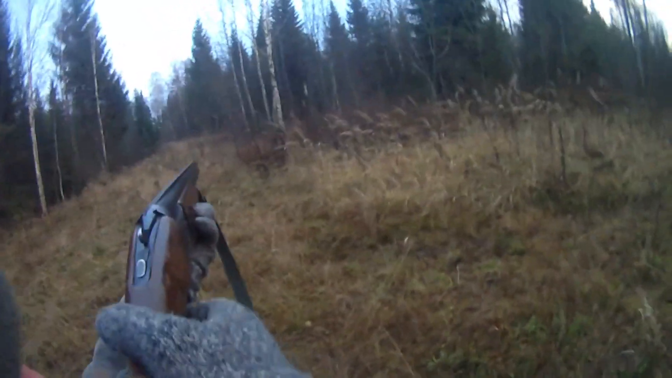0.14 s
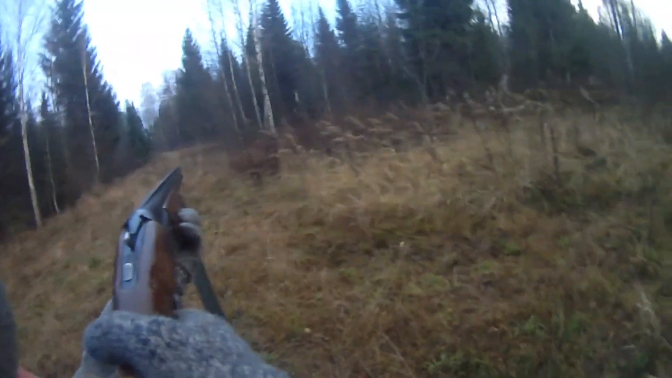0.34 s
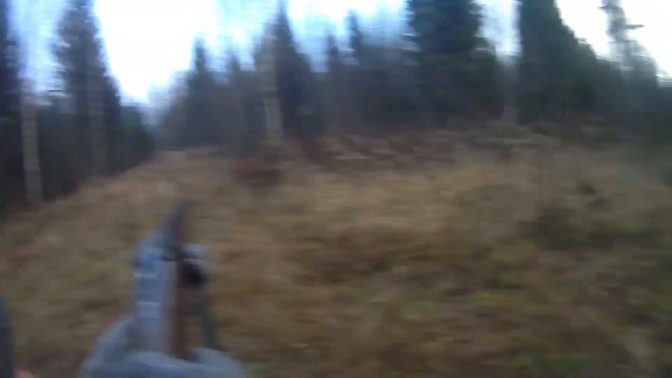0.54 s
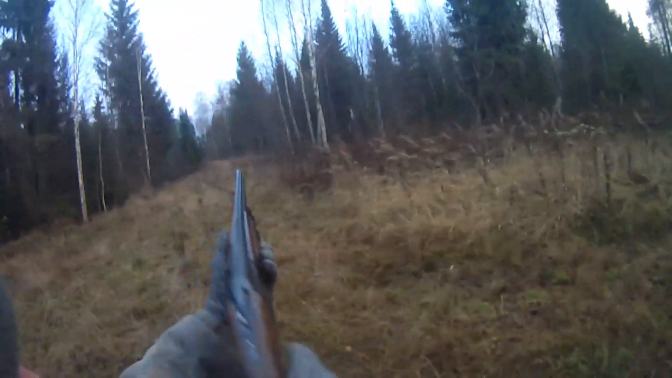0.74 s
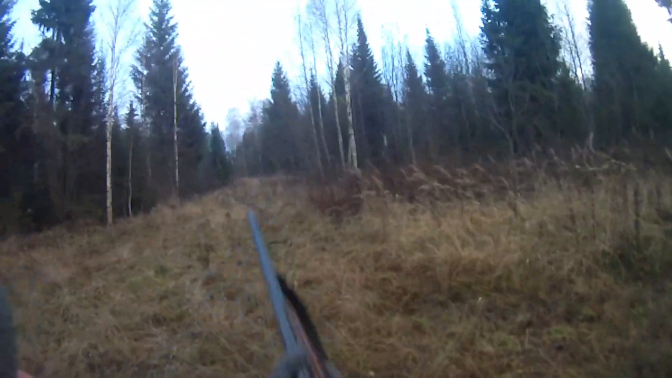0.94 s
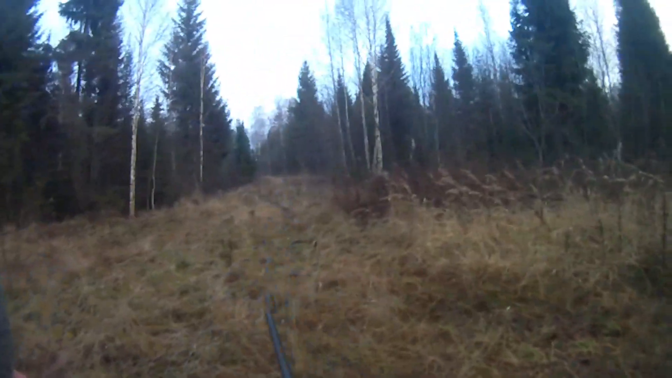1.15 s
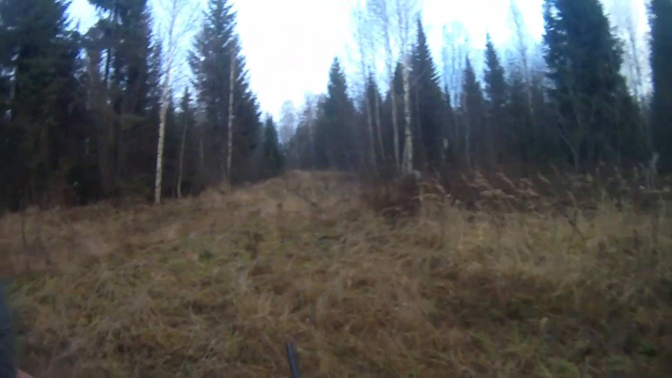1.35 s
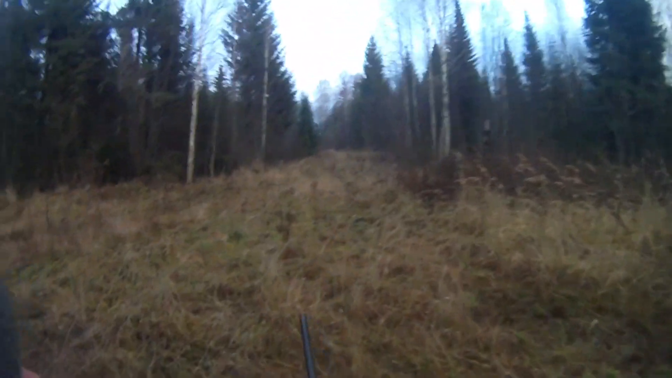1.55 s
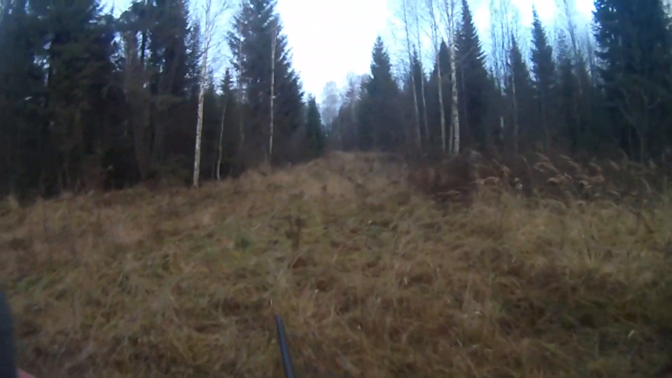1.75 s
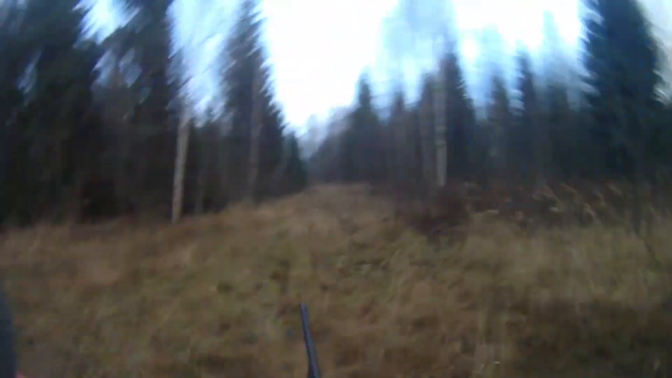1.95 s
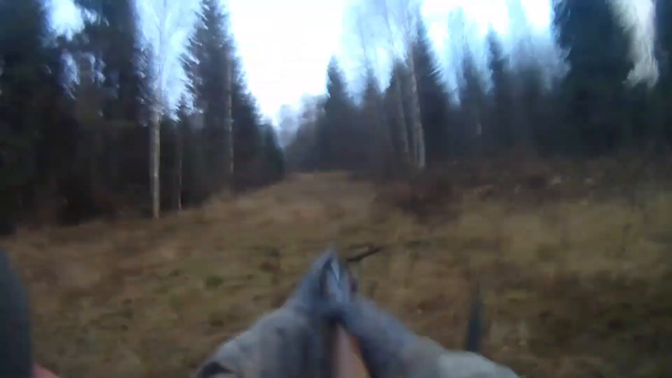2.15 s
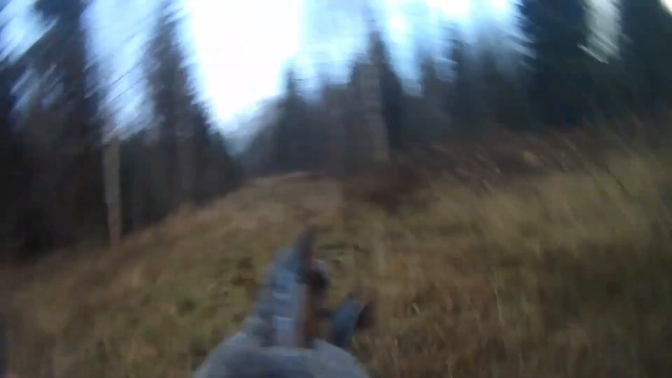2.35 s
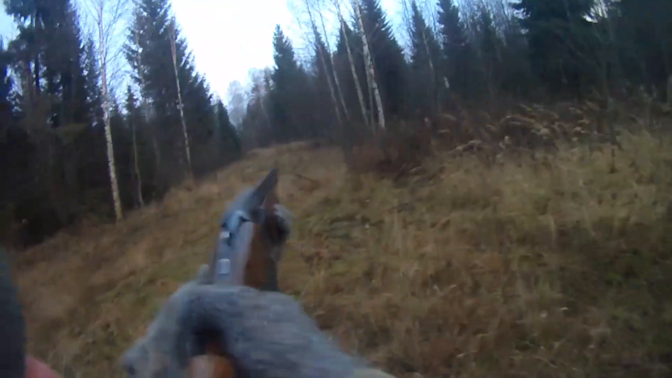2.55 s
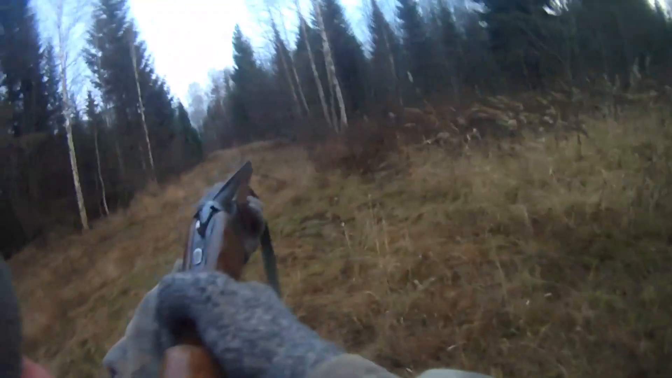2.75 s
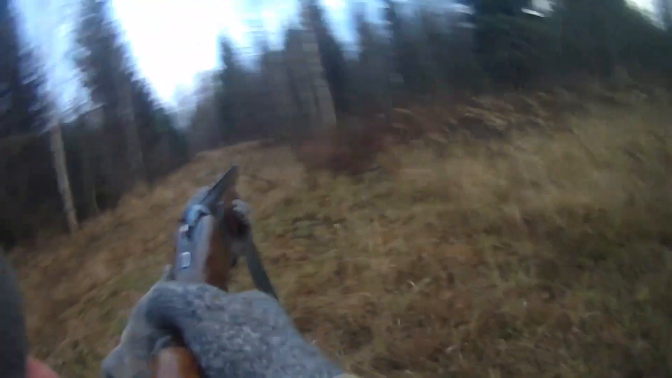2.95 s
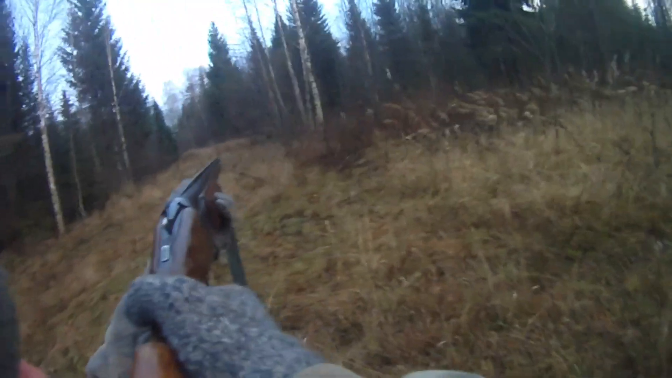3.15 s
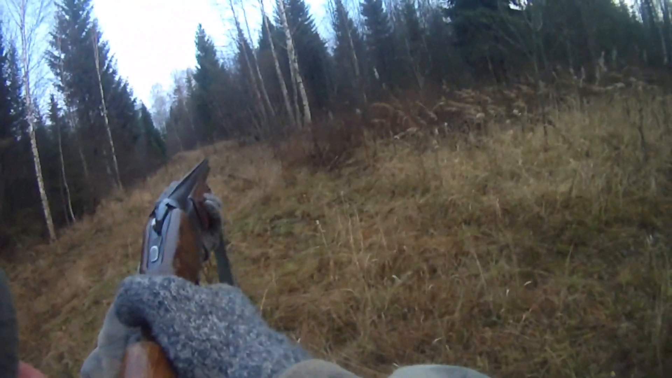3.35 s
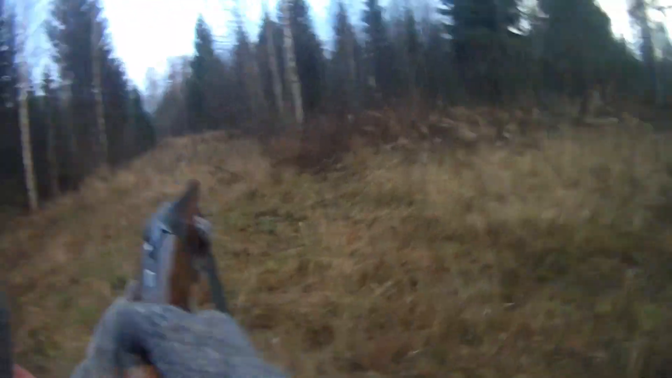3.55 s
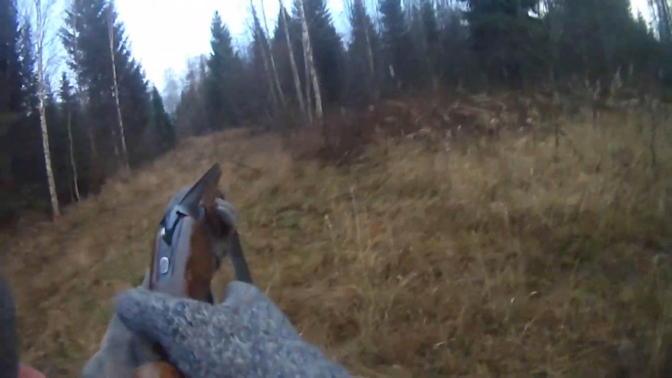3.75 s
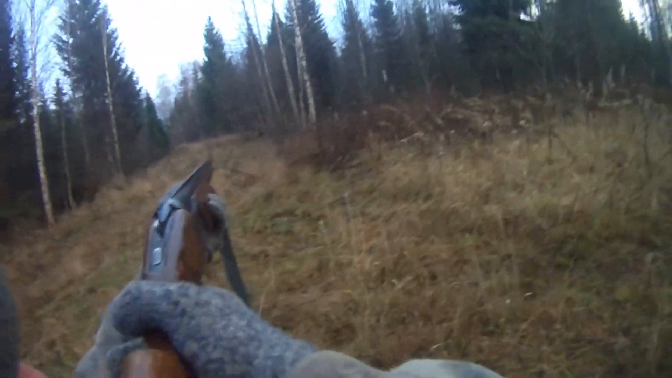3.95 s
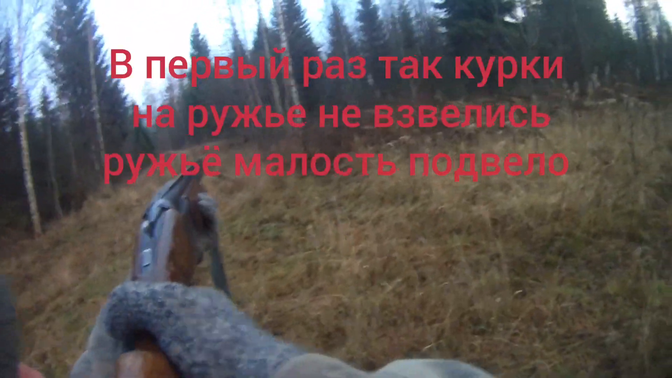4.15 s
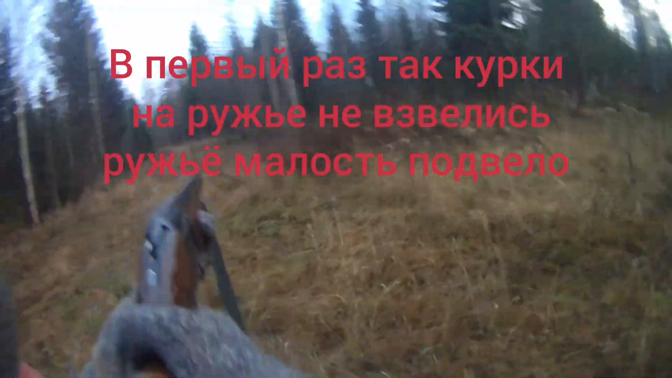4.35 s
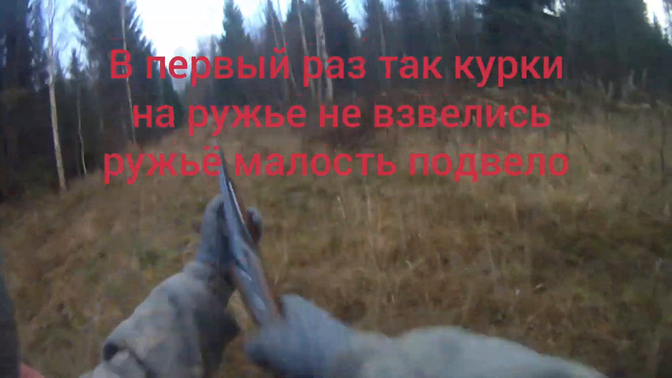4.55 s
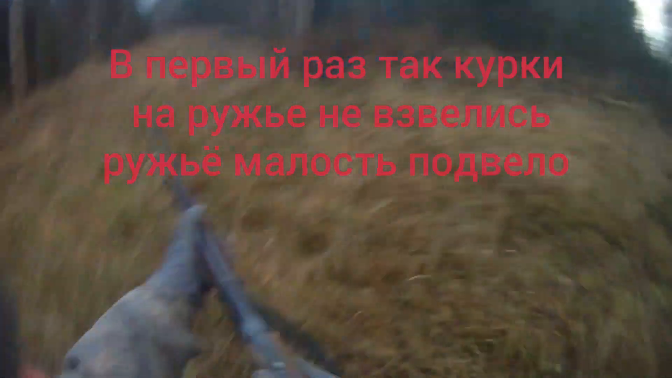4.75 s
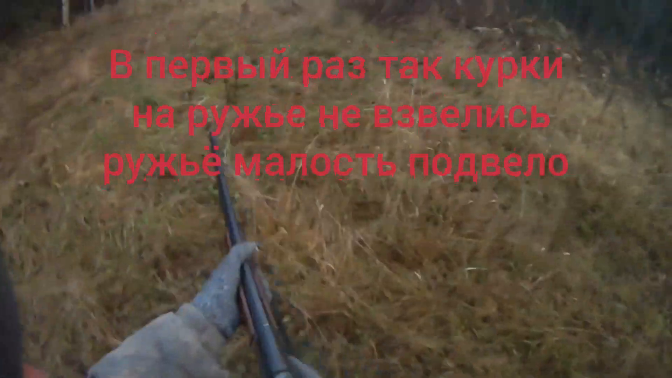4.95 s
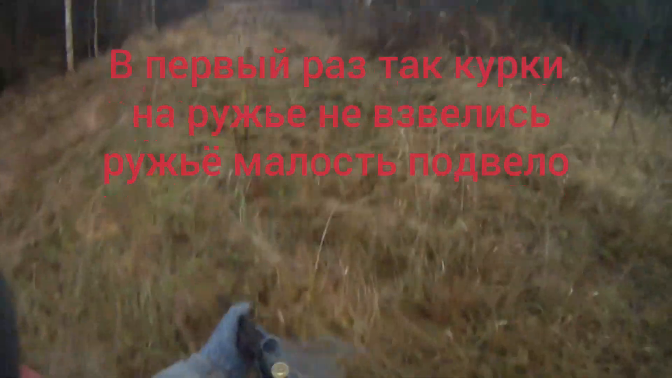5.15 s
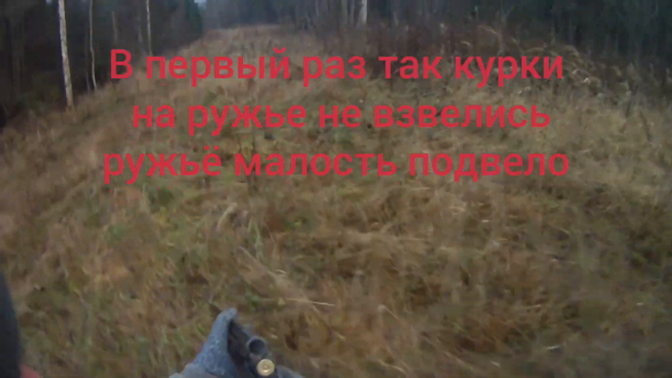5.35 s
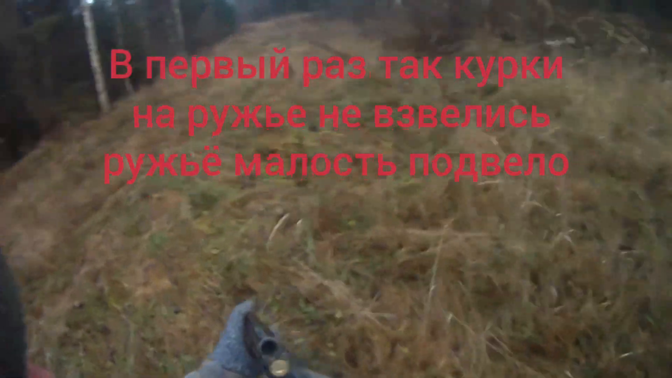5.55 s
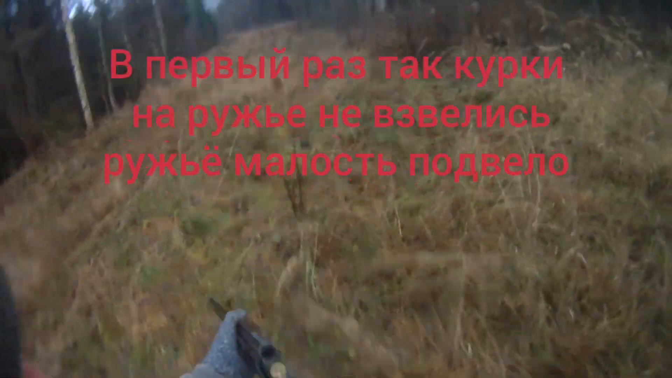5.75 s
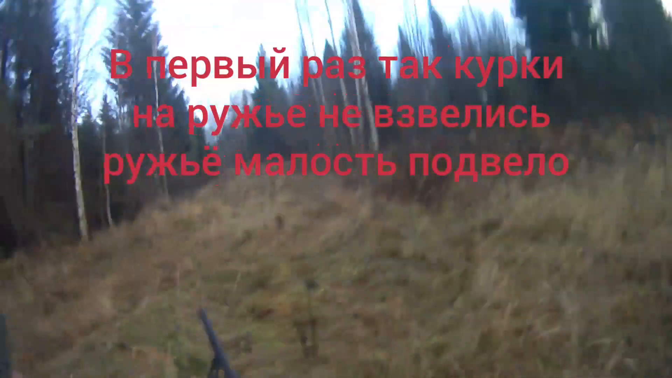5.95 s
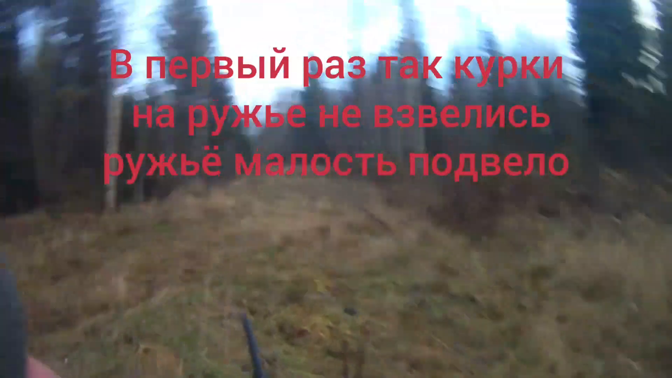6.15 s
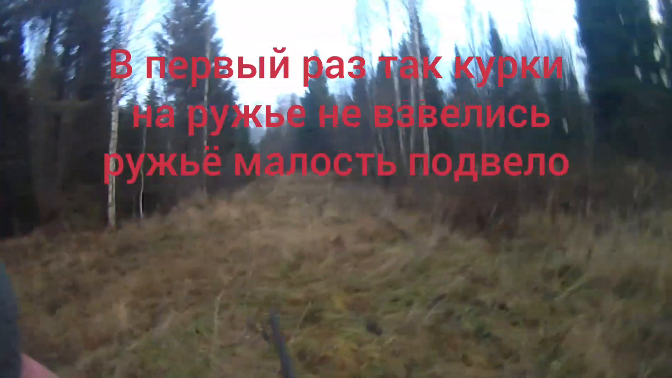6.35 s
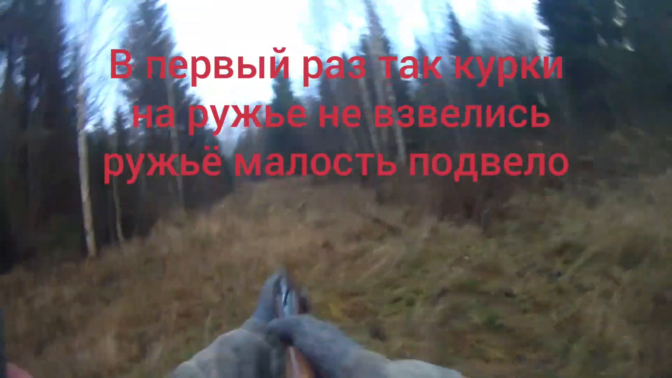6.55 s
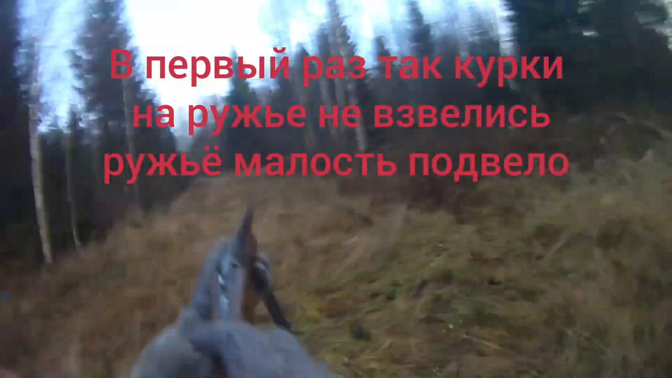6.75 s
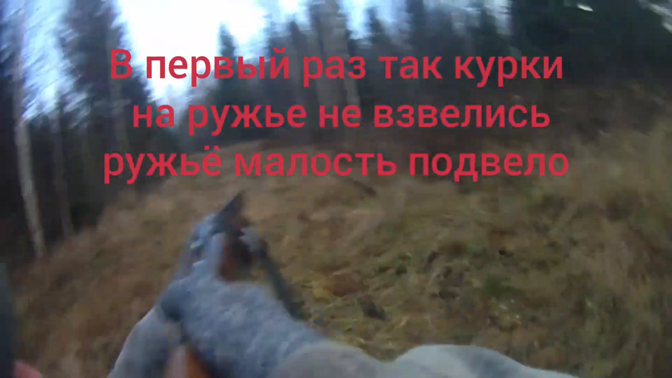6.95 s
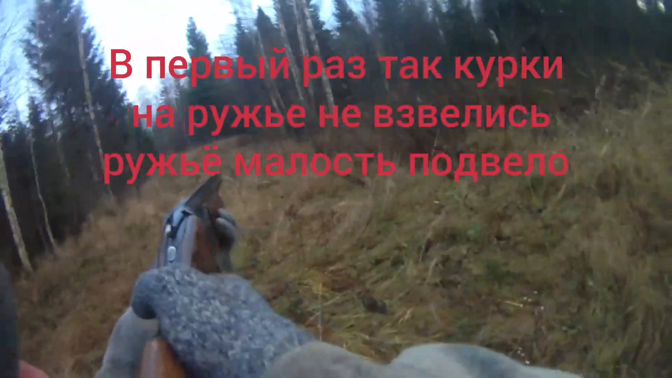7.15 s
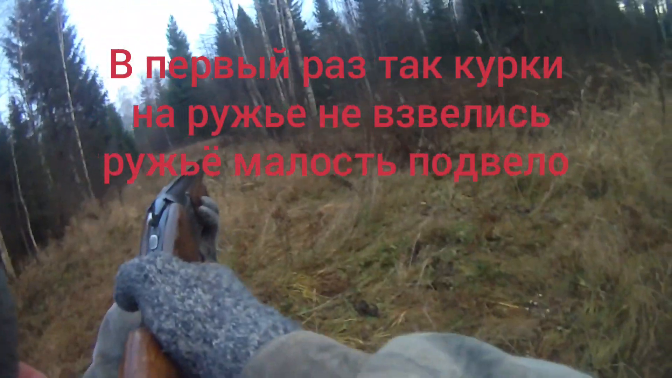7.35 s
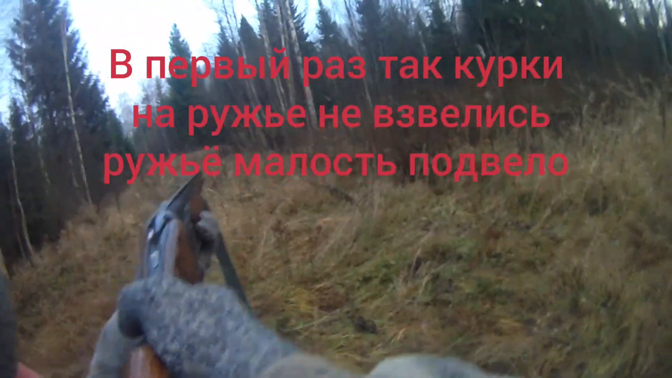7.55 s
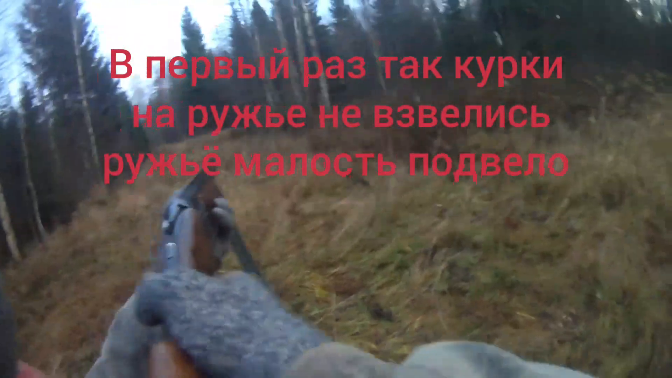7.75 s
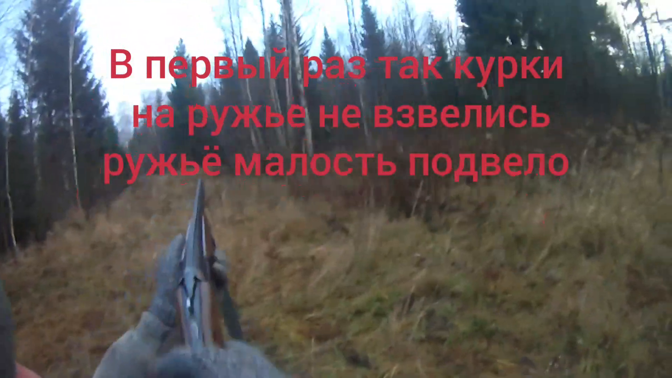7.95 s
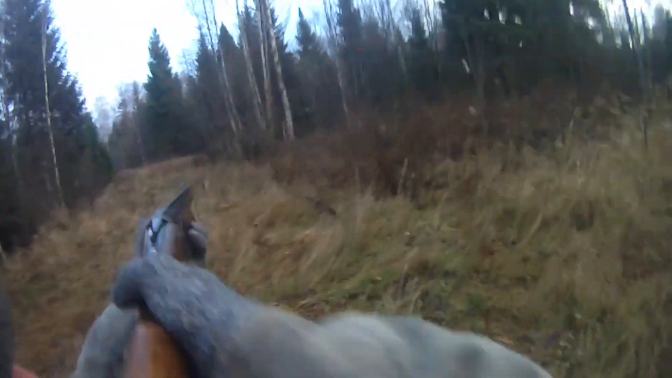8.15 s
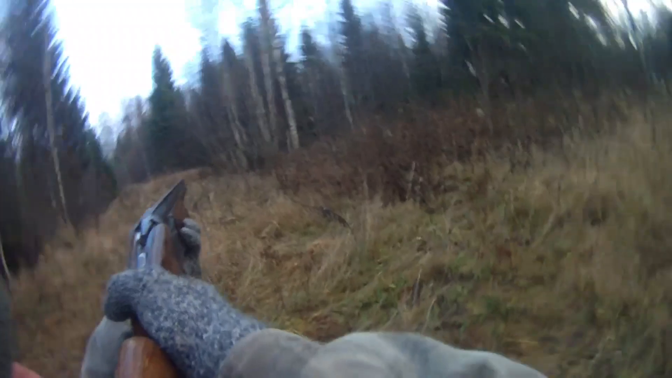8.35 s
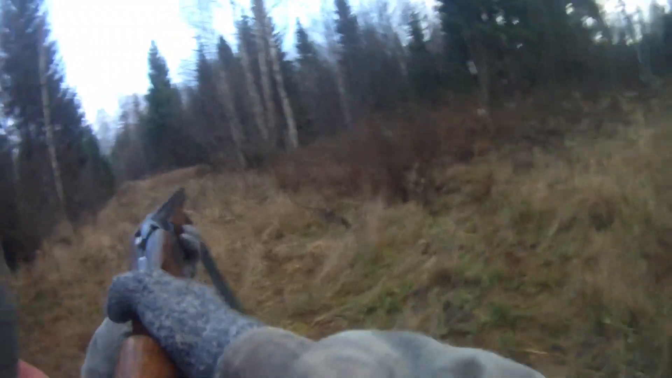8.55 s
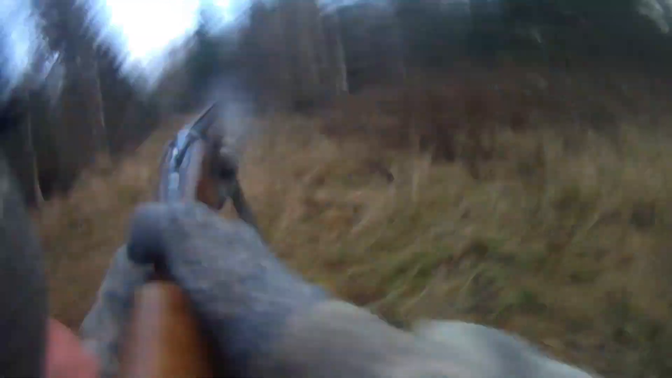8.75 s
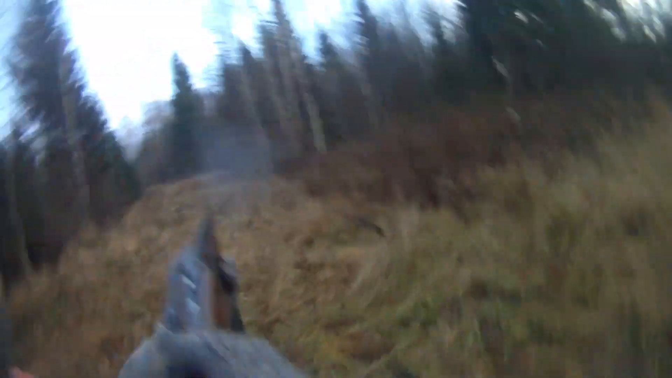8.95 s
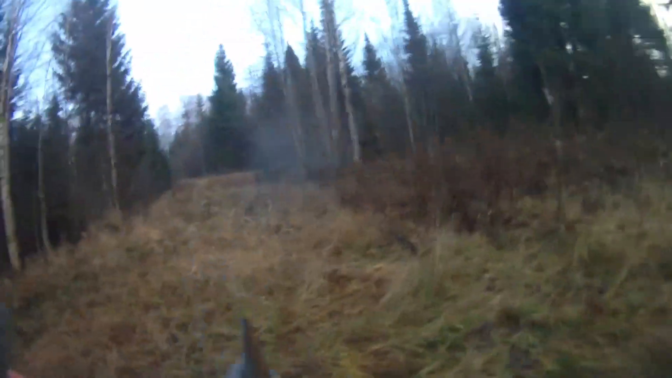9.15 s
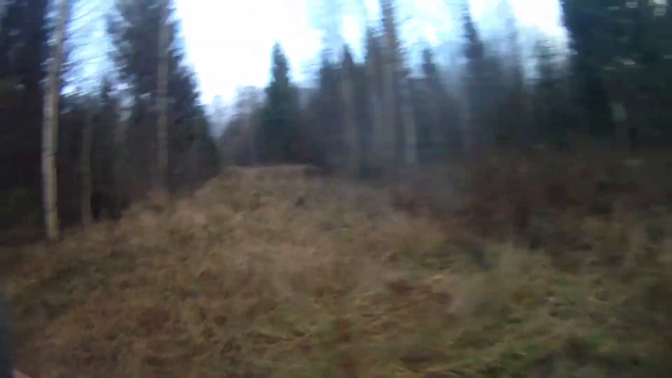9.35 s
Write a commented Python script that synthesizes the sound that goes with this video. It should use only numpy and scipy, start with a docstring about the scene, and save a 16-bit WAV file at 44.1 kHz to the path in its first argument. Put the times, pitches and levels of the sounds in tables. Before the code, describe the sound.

A double-barrelled shotgun is worked very close to the microphone, dry and bright. Loud clacks stand out among constant light ticking of a loose sling swivel, gritty scrapes, faint crackle and woollen rubbing with soft low bumps. A dull distant shot echo fades beneath the opening; a brief squeak or two comes later. Finally the gun fires, overloading harshly, and the forest answers with a quickly fading noisy wash.

```python
"""A shotgun is handled in a forest clearing, close to a head-worn microphone.
First an earlier shot rolls back from the trees: shaped noise falling over 2 s. Until 8.7 s contact noise
rings steel and stock modes as knocks, clicks, scrapes and crackle; some blows hum, gloves and sleeves
rustle as shaped noise, and gliding tones squeak near 6.5 and 7 s. At 8.73 s the gun fires, a noise burst
that overloads the input, and the forest answers to the end."""
import sys
import numpy as np
from scipy import signal
from scipy.fft import rfft, irfft
from scipy.io import wavfile
from scipy.ndimage import uniform_filter1d

SR = 44100
rng = np.random.default_rng(int(sys.argv[2]) if len(sys.argv) > 2 else 0)


def wrap_up_sound(samples):
    """Save the sound to the file named by the first command line argument, as 16-bit audio."""
    columns = np.atleast_2d(samples).T
    # keep every value between -1 and 1, then stretch to whole-number steps
    tamed = np.clip(columns, -1, 1)
    steps = np.round(tamed * 32767).astype(np.int16)
    wavfile.write(sys.argv[1], SR, steps)


N = 414099

# blows on lock, lever and stock:
# (time [s], ring level [dB], ring centre [Hz], tick level [dB], tick centre [Hz], rattle t60 [s])
BLOWS = [(0.394, -16, 1920, -22, 7360, 0.014), (0.4111, -3, 1460, -18, 7600, 0.011),
         (0.585, -18.5, 1260, -25, 5160, 0.016), (0.685, -18, 1900, -25, 5100, 0.01),
         (0.7132, -2.5, 1470, -20, 5370, 0.022), (.7194, -9.5, 625, -18, 4800, 0.029),
         (0.7364, -5.5, 1280, -12, 5800, 0.0021), (1.0275, -27, 630, -33.5, 3950, 0.012),
         (1.2302, -11.5, 600, -51, 6700, 0.021), (1.729, -18.5, 407, -47, 5000, .009),
         (1.759, -19, 905, -33, 4500, 0.0054), (1.776, -19.5, 400, -50, 4000, 0.0066),
         (1.7906, -23, 1470, -39, 4600, 0.032), (1.835, -29, 2480, -21.5, 4250, 0.008),
         (1.8403, -17, 1100, -37, 5200, 0.012), (1.9106, -1.5, 1190, -18, 4570, 0.006),
         (1.9457, -5, 2150, -24, 4300, .023), (1.9631, 1.5, 756, 1, 3600, 0.0072),
         (2.0919, -16.5, 2700, -24, 3870, 0.017), (2.1562, -19, 1980, -35, 4300, 0.0026),
         (2.1661, -23, 370, -22.5, 4070, 0.0055), (2.288, -14.5, 1800, -15.5, 4740, 0.0077),
         (2.35, -17.5, 960, -26, 4530, 0.0086), (2.395, -19, 2550, -25.5, 5070, 0.019),
         (2.6151, -25.5, 1000, -26.5, 4600, 0.015), (2.663, -21.5, 1280, -33, 4570, 0.017),
         (2.9698, -19.5, 2120, -32, 4430, 0.025), (3.4207, -19, 1530, -24.5, 5800, 0.0039),
         (3.44, -7, 1440, -22, 8200, 0.0065), (3.5261, -16.5, 960, -37, 5000, 0.0068),
         (3.5788, -15.5, 2180, -26, 5160, 0.0096), (3.5947, -23.5, 1390, -34, 4500, 0.014),
         (3.7102, -22.5, 1810, -24, 5530, 0.013), (3.7259, -1, 1670, -8.5, 6960, 0.0079),
         (3.84, -12, 1390, -24, 4800, 0.0045), (3.9414, -16.5, 810, -27, 4640, 0.034),
         (4.071, -18, 770, -42, 4300, 0.01), (4.126, -20.5, 1590, -38, 4600, 0.016),
         (4.4873, -4, 1390, -18.5, 6600, 0.01), (4.4993, -15, 1270, -24, 4800, 0.016),
         (4.529, -15.5, 1500, -35, 4500, 0.027), (4.6152, -15, 1060, -23.5, 4000, .015),
         (4.698, -22, 2520, -20, 5560, 0.01), (4.7365, -14, 2180, -24.5, 4640, 0.022),
         (4.785, -10, 1810, -20.5, 4600, 0.0098), (4.968, -16, 1600, -32, 6000, .015),
         (4.981, -13, 1680, -27, 6500, .012), (5.0049, 6.5, 1550, 1, 8800, 0.011),
         (5.058, -21, 1650, -34.5, 5000, .025), (5.0842, -8.5, 1640, -12.5, 6700, 0.01),
         (5.1013, -16.5, 1660, -12, 5500, 0.013), (5.1059, -4, 2000, -1.5, 9150, 0.012),
         (5.2127, -25.5, 1270, -30, 5800, 0.033), (5.2327, -26, 1680, -31.5, 8000, 0.013),
         (5.428, -22, 2170, -26, 4630, 0.02), (5.8223, -17.5, 612, -25, 6100, 0.012),
         (5.8288, -16, 2130, -18, 7600, 0.011), (5.845, -15.5, 1380, -20.5, 7800, .015),
         (5.8895, -8.5, 2130, -22, 5300, 0.012), (5.8996, 2, 1420, -1, 4770, 0.0071),
         (5.9, -6, 584, -30, 4000, 0.019), (5.971, -13, 2330, -21, 3400, 0.0069),
         (5.99, -28, 2180, -24, 4000, 0.03), (6.122, -28, 890, -36, 4300, 0.019),
         (6.159, -26, 1810, -25, 5450, 0.0068), (6.1664, -22, 1520, -30.5, 3850, 0.017),
         (6.207, -25, 866, -50, 4000, 0.0035), (6.2152, -23, 367, -42, 3800, 0.0089),
         (6.5005, -25.5, 2440, -32.5, 4300, 0.026), (6.5483, -20, 1140, -29.5, 6400, 0.021),
         (6.6773, -15, 1600, -25, 5400, 0.019), (6.7051, -18, 2500, -20, 5960, .016),
         (6.765, -13, 1840, -24, 4500, 0.0049), (6.823, -10, 1850, -17, 4800, 0.015),
         (6.8914, -8, 2200, -17.5, 4260, 0.012), (6.9589, -16, 770, -30, 9100, 0.02),
         (6.973, -12.5, 615, -29, 6300, 0.013), (6.9813, -9.5, 1670, -32, 3900, 0.0055),
         (7.0325, -17, 1280, -34, 5300, 0.026), (7.06, -10.5, 2240, -19.5, 4850, 0.013),
         (7.084, -17.5, 2700, -23.5, 3700, .005), (7.1174, -16, 1880, -28.5, 4270, 0.0076),
         (7.494, 6.5, 1180, 2.5, 6670, .011), (7.507, -22, 850, -36, 6660, 0.013),
         (7.8098, -22.5, 575, -32, 4800, 0.0092), (7.8166, -12.5, 1690, -25.5, 5360, 0.0047),
         (7.9128, -18, 556, -31, 6900, 0.0068), (7.9373, -17, 438, -27, 5900, .008),
         (8.1749, -18.5, 750, -29, 7700, 0.0086), (8.2925, -19, 1870, -23, 4500, 0.0088),
         (8.333, -13.5, 1980, -21.5, 4900, 0.027), (8.3608, -25, 2440, -19, 4000, 0.0044),
         (8.3941, -13, 2280, -21.5, 4450, 0.017), (8.5263, -27.5, 790, -33, 3670, 0.012),
         (8.689, -17, 870, -31, 5900, 0.0093)]
# loose sling swivel tapping its stud: (time [s], ring level [dB])
SWIVEL_TAPS = [(.271, -27), (.294, -22.5), (.5117, -20.5), (.545, -23), (.661, -19.5), (.7717, -24.5),
               (.782, -33), (.872, -38), (.9567, -29), (1.171, -27.5), (1.2221, -34), (1.268, -30),
               (1.5008, -27.5), (1.6037, -23.5), (1.6649, -28.5), (1.715, -30), (1.9762, -19),
               (2.4327, -20.5), (2.445, -18), (2.02, -29), (2.235, -25), (2.378, -32), (2.5976, -31),
               (2.5325, -25.5), (2.7059, -31), (2.728, -22.5), (2.765, -25), (2.795, -31), (2.8244, -23.5),
               (2.8596, -24.5), (2.9052, -32), (2.924, -19), (3.0118, -27), (3.0328, -18.5), (3.068, -22.5),
               (3.1017, -33), (3.1366, -23), (3.2295, -33), (3.62, -25), (3.8536, -20), (4.15, -27.5),
               (4.21, -30), (4.3446, -25.5), (4.378, -21.5), (4.4393, -19), (4.796, -16.5), (4.8402, -27),
               (5.4446, -35), (5.4785, -37), (5.507, -35.5), (5.751, -39), (6.025, -40), (6.045, -45),
               (6.091, -32), (6.146, -32), (6.1832, -31), (6.249, -36.5), (6.3826, -36), (6.61, -42),
               (6.624, -45), (6.8177, -15.5), (6.8531, -26), (6.933, -22), (7.162, -26), (7.1895, -25.5),
               (7.2197, -27), (7.252, -25), (7.2763, -22), (7.314, -28), (7.338, -30.5), (7.6047, -35),
               (7.69, -42), (7.725, -43), (8.0295, -32), (8.212, -29.5), (8.2446, -21), (8.3202, -21),
               (8.448, -34), (8.497, -25), (8.557, -28.5), (8.5768, -19), (8.6464, -28), (8.6697, -31)]
# parts sliding, gloves dragging:
# (time [s], length [s], ring level [dB], ring centre [Hz], tick level [dB])
SCRAPES = [(0.701, 0.038, -5, 1400, -24), (2.153, 0.077, -20, 1850, -25.5), (2.273, 0.049, -15, 1140, -36),
           (3.502, 0.084, -24.5, 540, -35.5), (4.461, 0.12, -14.5, 1280, -33),
           (4.991, .018, -15.5, 1650, -31), (5.095, 0.038, -15.5, 1700, -13.5),
           (5.865, 0.071, -14, 1240, -23.5), (5.975, 0.029, -20, 2000, -38), (7.486, 0.028, -3, 1092, -10),
           (7.792, 0.083, -19, 800, -53.5), (7.907, 0.057, -18.5, 770, -39)]
# barrels or breech humming after a blow: (time [s], frequency [Hz], level [dB], t60 [s])
HUMS = [(3.445, 844, -26, 0.074), (3.733, 824, -24.5, 0.099), (4.961, 388, -21.5, 0.14),
        (5.006, 1630, -9, .025), (5.116, 1800, -18, 0.041), (5.239, 1770, -19, 0.033),
        (5.905, 840, -26, 0.097), (7.498, 855, -17.5, 0.12)]
# modes of steel, stock and microphone case: (frequency [Hz], relative level [dB], t60 [s])
GUN_MODES = [(384, -10, 0.014), (462, -3, 0.013), (679, 2.5, 0.0091), (1038, -3.5, 0.011),
             (1313, -3, 0.0094), (1488, 4, 0.0068), (1696, 2.5, 0.011), (2146, 0, 0.012),
             (2443, 2.5, 0.0074), (2883, -3, 0.0053)]
# modes of small steel parts, colouring each tick: (frequency [Hz], relative level [dB], t60 [s])
STEEL_MODES = [(3265, 28.5, 0.0011), (4443, -0.5, 0.002), (5000, 15, 0.0013), (6400, 8, 0.0015),
               (8540, -5.5, 0.0072), (9260, -2.5, 0.0043), (12000, -9, 0.0072), (12200, -4, 0.0019)]
# sling swivel squeaks: (time [s], length [s], start [Hz], end [Hz], level [dB])
SQUEAKS = [(6.538, .04, 1510, 930, -28), (6.959, 0.012, 9150, 9500, -16)]
# gloves and sleeves moving: (time [s], rub level [dB], bump level [dB])
MOVES = [(0, -42, -77), (.6, -36.5, -60), (.7, -30.5, -42), (.92, -44, -83), (1.4, -46.5, -52),
         (1.75, -44, -36), (1.95, -34, -39), (2.05, -39.5, -45), (2.2, -36.5, -38), (2.55, -47, -60.5),
         (2.89, -43, -61), (3.33, -51, -76), (3.57, -34.5, -60), (3.65, -46, -58), (4.43, -44.5, -64),
         (4.51, -28, -50), (4.63, -37.5, -56), (4.88, -33, -35), (5.1, -39.5, -46), (5.23, -52, -53.5),
         (5.8, -52.5, -69), (5.88, -24, -47), (5.94, -44, -57), (6.03, -45.5, -44.5), (6.2, -55, -44),
         (6.4, -47.5, -52), (6.7, -32, -37.5), (6.99, -35, -49.5), (7.2, -44.5, -68.5), (7.45, -50, -66.5),
         (7.73, -58.5, -71), (7.85, -40, -52.5), (8.01, -51.5, -73), (8.18, -37, -51), (8.28, -50, -57),
         (8.37, -42.5, -57.5), (8.74, -48, -57)]
# answer to the earlier shot: (time [s], level [dB])
FAR_ECHO = [(0, -17), (.2, -17), (.8, -28), (1.4, -36), (2, -40.5)]
# answer to the near shot: (time [s], body level [dB], treble level [dB], bass level [dB])
NEAR_ECHO = [(8.742, -23, -31, -43), (8.8, -19, -39.5, -34), (8.88, -24.5, -47.5, -67),
             (9.15, -36, -68.5, -88.5), (9.3, -41, -81.5, -77), (9.39, -31, -66, -81)]

# noise spectra, all: (frequency [Hz], relative density [dB])
# muzzle blast
BLAST_SPECTRUM = [(30, -28), (420, -6), (1360, 0), (2130, -2), (2700, -19), (15500, -32)]
# cloth rub
RUB_SPECTRUM = [(130, -54), (250, -8), (520, -1), (900, -1.5), (1800, -5.5), (2400, -13), (3000, -28),
                (4200, -63.5)]
# sleeve swish
SWISH_SPECTRUM = [(1650, -61), (2800, -3.5), (3100, -3.5), (9390, -11), (15500, -21)]
# low bump, also the bass of the near echo
BUMP_SPECTRUM = [(15, -48), (25, -18.5), (130, -15.5), (300, -9.5), (460, -28), (800, -100)]
# answer to the earlier shot
FAR_SPECTRUM = [(150, -91.5), (230, -34), (400, 0.5), (780, 4), (1560, -6.5), (2200, -21.5), (3000, -39.5),
                (4200, -70)]
# body of the answer to the near shot
NEAR_BODY_SPECTRUM = [(150, -49), (230, -30), (500, -6), (1070, -3.5), (1700, -7), (2340, -19), (2900, -33),
                      (4200, -67)]
# treble of the answer to the near shot
NEAR_TREBLE_SPECTRUM = [(2000, -24), (3000, 2.5), (9000, -7.5), (15500, -24)]

SWIVEL_RING_HZ, SWIVEL_TICK_HZ, SWIVEL_T60_S = 2200, 4230, 0.013
SWIVEL_TICK_REL_DB = -11  # tick against ring
SWIVEL_SPREAD_LOG = 0.087  # standard deviation of the natural log of each ratio
SHOT_S, SHOT_DB, SHOT_LENGTH_S = 8.729, 4, 0.0115  # length: onset to start of fall
# swish follows the rub, but swings less
SWISH_OFFSET_DB, SWISH_DB_PER_RUB_DB = -25.5, 0.8
SIDE_REL_DB = -15.5  # channel difference against the treble
EDGE_HZ = 15650


def gain_of(db):
    """Amplitude factor of a level in dB."""
    return 10 ** (np.asarray(db) / 20)


def evened(x):
    """Scale to unit RMS."""
    return x / np.sqrt(np.mean(x ** 2) + 1e-20)


def peaked(rows):
    """Scale each row to unit peak."""
    return rows / (abs(rows).max(1, keepdims=True) + 1e-20)


def read(points, hz):
    """Interpolate a spectrum over log frequency."""
    f, value = np.transpose(points)
    return np.interp(np.log(hz + 1), np.log(f + 1), value)


def add(mix, start_s, sound):
    """Add a sound at its time, cut at the end of the mix."""
    part = mix[round(start_s * SR):][:len(sound)]
    part += sound[:len(part)]


def columns(rows):
    """Level curves in dB at every sample, silent outside the table's span."""
    s, *levels = np.transpose(rows)
    t = np.arange(N) / SR
    return [np.interp(t, s, level, left=-200, right=-200) for level in levels]


def noise(spectrum, patchy_db, flicker_db, count=N):
    """Unit-RMS noise from random short-time spectra with drifting patches and wide-band flicker."""
    frames, hz = count // 256 + 5, np.fft.rfftfreq(512, 1 / SR)
    real, imaginary, patches = rng.standard_normal((frames, 257, 3)).T
    patches = uniform_filter1d(patches, size=5, axis=0)
    patches = evened(uniform_filter1d(patches, size=5, axis=1))
    flicker = evened(uniform_filter1d(rng.standard_normal(frames), size=2))
    level_db = read(spectrum, hz)[:, None] + patchy_db * patches + flicker_db * flicker
    z = (real + 1j * imaginary) * gain_of(level_db)
    window = np.sqrt(np.hanning(513)[:-1])
    return evened(signal.istft(z, window=window, nperseg=512, noverlap=256)[1][:count])


def struck(modes, contacts, centre_hz, db_per_octave, scatter_db):
    """Contact forces ring the modes; those near the centre ring most, and no two blows alike."""
    hz, db, t60_s = np.transpose(modes)[:, :, None]
    t = np.arange(3000) / SR
    swell = 1 - np.exp(-t * hz / 1.02)  # a contact of finite length starts each mode softly
    rings = swell * gain_of(-60 * t / t60_s) * np.sin(2 * np.pi * hz * t)
    octaves_away = abs(np.log2(hz.T / centre_hz[:, None]))
    scatter = scatter_db * rng.standard_normal(octaves_away.shape)
    share = gain_of(db.T - db_per_octave * octaves_away + scatter)
    return peaked(irfft(rfft(contacts, 8192) * (share @ rfft(rings, 8192))))


def played(s, contacts, ring_db, ring_hz, tick_db, tick_hz):
    """Each contact row excites a body ring and a steel tick, laid at its time."""
    rings = struck(GUN_MODES, contacts, ring_hz, db_per_octave=15.0, scatter_db=2.0)
    ticks = struck(STEEL_MODES, contacts, tick_hz, db_per_octave=14.0, scatter_db=4.5)
    sounds = gain_of(ring_db)[:, None] * rings + gain_of(tick_db)[:, None] * ticks
    out = np.zeros(N)
    for start_s, sound in zip(s, sounds):
        add(out, start_s, sound)
    return out


def rattle(t60_s):
    """Each blow is a short noisy run of contacts; long rattles also swell more slowly."""
    t, t60_s = np.arange(2000) / SR, t60_s[:, None] + 1e-4
    rise_s = 0.19 * t60_s
    fall = gain_of(-60 * np.maximum(t - rise_s, 0) / t60_s)
    force = np.minimum(t / rise_s, 1) * fall
    return force * rng.standard_normal(force.shape)


def blows():
    """Knocks and clacks: rattling contacts ring modes around each blow's own centres."""
    s, ring_db, ring_hz, tick_db, tick_hz, t60_s = np.transpose(BLOWS)
    return played(s, rattle(t60_s), ring_db, ring_hz, tick_db, tick_hz)


def swivel():
    """One small click, again and again, a little different in pitch and length each time."""
    s, db = np.transpose(SWIVEL_TAPS)
    ring, tick, length = np.exp(SWIVEL_SPREAD_LOG * rng.standard_normal((len(s), 3))).T
    contacts = rattle(SWIVEL_T60_S * length ** 2)
    return played(s, contacts, db, SWIVEL_RING_HZ * ring, db + SWIVEL_TICK_REL_DB, SWIVEL_TICK_HZ * tick)


def scrapes():
    """A slide is a ragged run of small contacts that catches and slips in clumps."""
    s, length_s, ring_db, ring_hz, tick_db = np.transpose(SCRAPES)
    u = np.clip(np.arange(5000) / SR / length_s[:, None], 0, 1)
    grit, catch = rng.standard_normal((2, len(s), 5000))
    judder = gain_of(5 * evened(uniform_filter1d(catch, size=150)))
    contacts = grit * judder * np.sin(np.pi * u ** 0.65)
    return played(s, contacts, ring_db, ring_hz, tick_db, np.full(len(s), 7300.0))


def hum():
    """One long decaying mode of the barrels or the open breech, with a 2 ms rise."""
    out, t = np.zeros(N), np.arange(SR // 4) / SR
    for s, hz, db, t60_s in HUMS:
        envelope = gain_of(db - 60 * t / t60_s) * np.minimum(t / 0.002, 1)
        add(out, s, envelope * np.sin(2 * np.pi * hz * t))
    return out


def swish_level():
    """Level of the sleeves' swish in dB at every sample."""
    return SWISH_OFFSET_DB + SWISH_DB_PER_RUB_DB * columns(MOVES)[0]


def crackle():
    """Tiny random ticks of fibres, buttons and swivels, stronger as the sleeves move."""
    s = np.sort(rng.uniform(0, 8.7, 420))
    size, length, ring, tick = rng.random((len(s), 4)).T
    db = swish_level()[(s * SR).astype(int)] - 0.5 - 10.5 * np.log(size + 0.1)  # few large, many small
    t60_s = 0.003 + 0.008 * length[:, None]
    force = gain_of(-60 * np.arange(500) / SR / t60_s)
    contacts = force * rng.standard_normal(force.shape)
    return played(s, contacts, db + 8, 1000 * 3 ** ring, db, 3300 * 2 ** tick)


def nearby(x):
    """Chest, arms and ground throw back a short bright noise blur of each sound."""
    t = np.arange(SR // 8) / SR
    bright = np.diff(rng.standard_normal(len(t) + 1))
    blur = bright * gain_of(-60 * t / 0.057) * (t > 0.002)
    return x + gain_of(-12.0) * signal.oaconvolve(x, blur / np.linalg.norm(blur))[:N]


def squeaks():
    """Stick and slip of dry steel: short gliding tones."""
    out = np.zeros(N)
    for s, length_s, start_hz, end_hz, db in SQUEAKS:
        u = np.arange(0, 1, 1 / (length_s * SR))
        hz = start_hz + (end_hz - start_hz) * u
        tone = np.sqrt(2) * np.sin(2 * np.pi * np.cumsum(hz) / SR)
        add(out, s, gain_of(db) * tone * np.sin(np.pi * u ** 0.97))
    return out


def shot():
    """Muzzle blast: a noise burst that swells in 2.7 ms, holds, then falls quickly."""
    out, t = np.zeros(N), np.arange(SR // 4) / SR
    fall = gain_of(-60 * np.maximum(t - SHOT_LENGTH_S, 0) / 0.008)
    envelope = np.clip(t / 0.0027, 0, 1) ** 2 * fall
    burst = noise(BLAST_SPECTRUM, patchy_db=0.3, flicker_db=1.8, count=len(t))
    add(out, SHOT_S, gain_of(SHOT_DB) * envelope * burst)
    return out


def cloth():
    """Rub of wool on wood, swish of sleeves, and bumps passed to the microphone."""
    rub_db, bump_db = columns(MOVES)
    rub = gain_of(rub_db) * noise(RUB_SPECTRUM, patchy_db=2.0, flicker_db=3.0)
    swish = gain_of(swish_level()) * noise(SWISH_SPECTRUM, patchy_db=2.0, flicker_db=1.0)
    bump = gain_of(bump_db) * noise(BUMP_SPECTRUM, patchy_db=4.0, flicker_db=4.5)
    return rub + swish + bump


def forest():
    """Trunks scatter each shot back as noise; near trunks make the level lumpy, treble fades before body."""
    far = gain_of(columns(FAR_ECHO)[0]) * noise(FAR_SPECTRUM, patchy_db=0.5, flicker_db=1.0)
    body_db, treble_db, bass_db = columns(NEAR_ECHO)
    body = gain_of(body_db) * noise(NEAR_BODY_SPECTRUM, patchy_db=1.0, flicker_db=1.0)
    treble = gain_of(treble_db) * noise(NEAR_TREBLE_SPECTRUM, patchy_db=4.0, flicker_db=1.5)
    bass = gain_of(bass_db) * noise(BUMP_SPECTRUM, patchy_db=3.0, flicker_db=5.0)
    return far + body + treble + bass


def scene():
    """Sum all sources into two equal channels."""
    gun = blows() + swivel() + scrapes() + hum() + crackle()
    # small parts radiate no bass
    gun = signal.sosfilt(signal.butter(2, 200.0, "high", fs=SR, output="sos"), gun)
    mid = nearby(gun) + squeaks() + shot() + cloth() + forest()
    return np.array([mid, mid])


def record(dry):
    """The input overloads with a hard knee; the channels differ slightly in the treble; band limit."""
    held = np.clip(dry, -0.95, 0.95)
    treble_band = signal.butter(2, [7000.0, 11000.0], "band", fs=SR, output="sos")
    treble = signal.sosfilt(treble_band, held[0])
    flutter = evened(uniform_filter1d(rng.standard_normal(N), size=100))
    side = gain_of(SIDE_REL_DB) * flutter * treble
    wide = held + np.array([side, -side])
    lowpass = signal.firwin(511, EDGE_HZ, window=("kaiser", 9), fs=SR)
    return signal.oaconvolve(wide, lowpass[None], "same")


dry = scene()
out = record(dry)
wrap_up_sound(out)
```